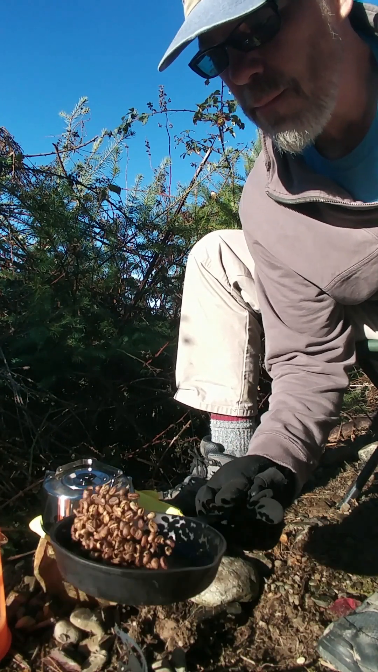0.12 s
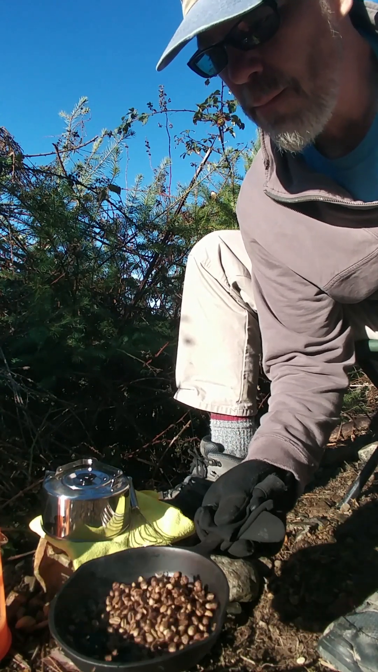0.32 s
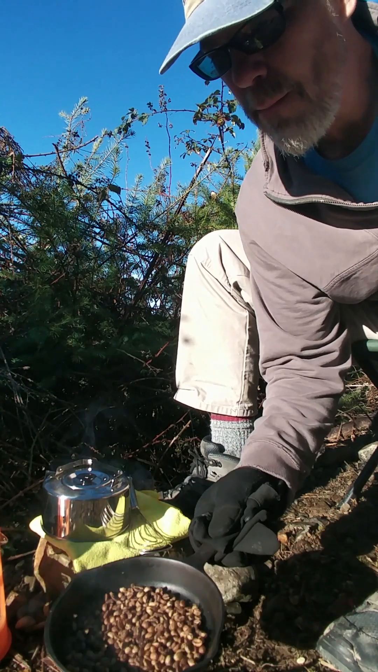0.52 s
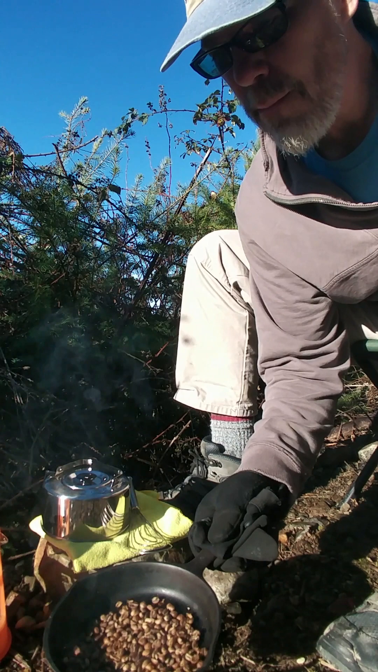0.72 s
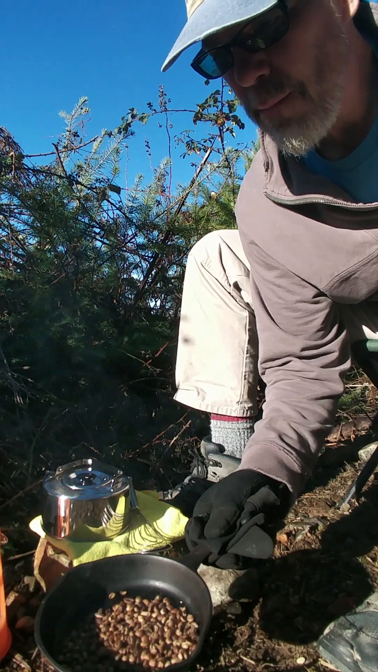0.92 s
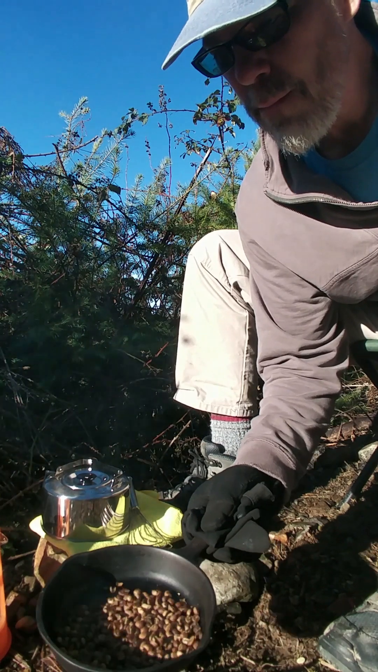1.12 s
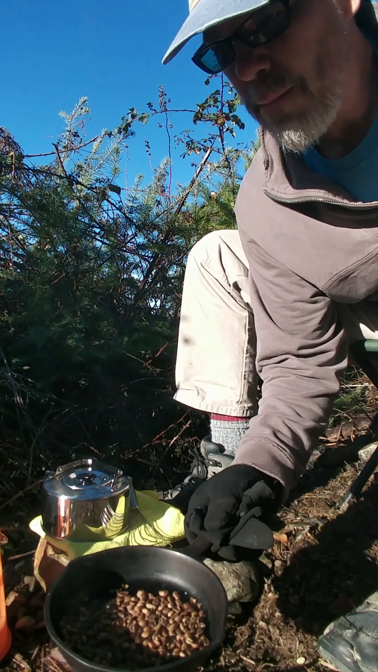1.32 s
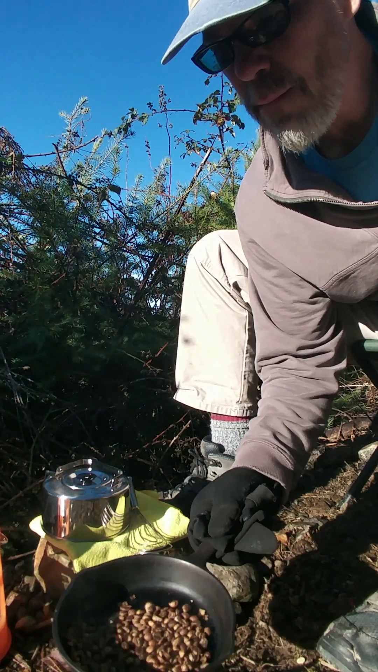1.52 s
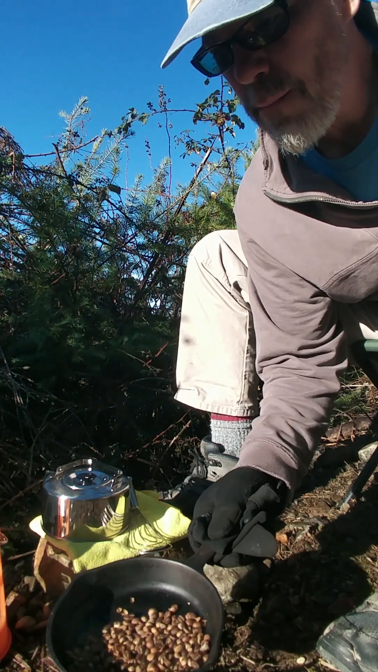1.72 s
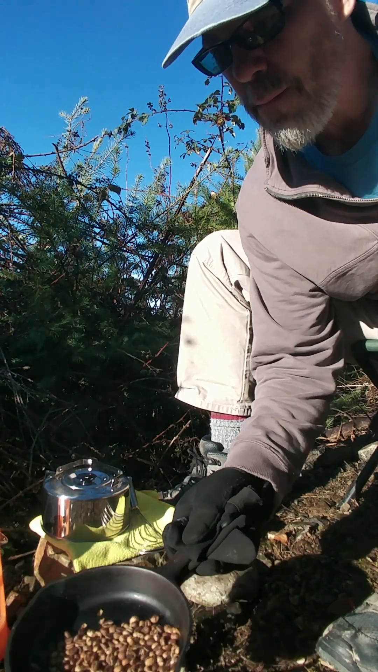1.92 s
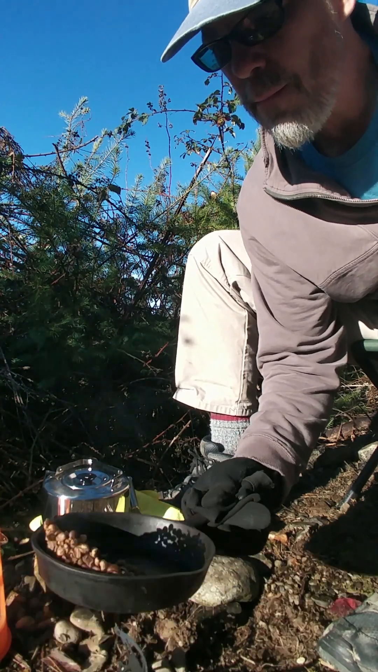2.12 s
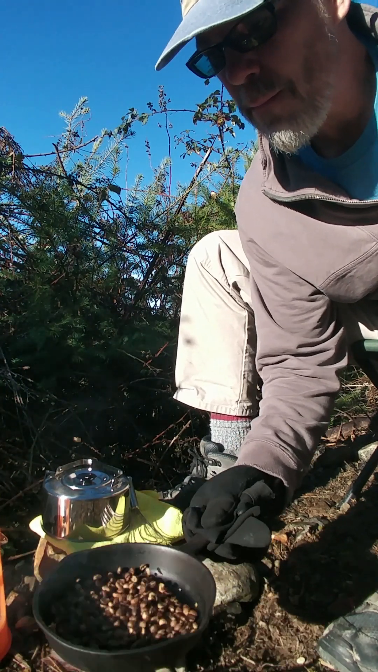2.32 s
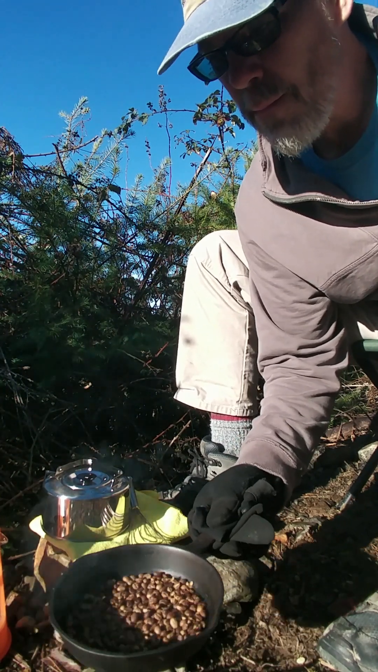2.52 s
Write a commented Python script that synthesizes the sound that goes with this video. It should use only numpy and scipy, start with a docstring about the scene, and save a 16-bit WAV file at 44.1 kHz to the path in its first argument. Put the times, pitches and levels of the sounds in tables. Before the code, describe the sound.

Coffee beans rattle twice across a small ringing metal pan over a low burner rumble.

```python
"""Coffee beans pour twice across a small, ringing metal pan as they roast outdoors over a camping burner.
Each tip of the pan sets off thousands of tiny contacts that click and excite the metal's modes.
Between the shakes the beans tinkle faintly, and one splits with a sharp crack.
Under it all the flame roars and the gas hisses over a low rumble, close to a pair of microphones."""
import sys
import numpy as np
from scipy import signal
from scipy.fft import rfft, irfft
from scipy.io import wavfile
from scipy.ndimage import uniform_filter1d

SR = 44100
rng = np.random.default_rng(int(sys.argv[2]) if len(sys.argv) > 2 else 0)


def wav_out(sig):
    """Save sig, one row per channel (or a flat mono array), as 16-bit PCM at SR to the path in sys.argv[1]."""
    wavfile.write(sys.argv[1], SR, np.round(np.clip(np.atleast_2d(sig).T, -1, 1) * 32767).astype(np.int16))


N = 114660

# modes of the pan (frequency [Hz], level [dB], t60 [s], left minus right [dB], left lag [ms])
PAN_MODES = [(1148, -8, .06, -2.4, .32), (2157, -2, .12, 3, .04), (3315, 1.5, .34, 2.5, -.07),
             (4000, -11.5, .16, 6, .08), (4877, -5, .22, 0, -.055), (5480, -15, .12, 2, .03),
             (5595, -9.5, .12, -4, .02), (6758, -14.5, .11, -2, .04), (7338, -14, .12, -2, -.04),
             (8057, -10.5, .09, -1, 0), (8404, -9, .1, 0, -.028), (8765, -5.5, .08, -3, -.013),
             (8837, -3, .1, -2, -.013), (9325, -16, .1, -2, 0)]
# tone of the dry click of bean on bean (frequency [Hz], level [dB])
BEAN_CLICK = [(200, -9.5), (700, -15), (1200, -8), (1650, -5), (2300, -16.5), (2700, -3), (3400, -2.5),
              (4400, -2.5), (5600, 3.5), (6700, -1), (7600, 2), (8800, 7), (9600, 3.5), (10600, -19),
              (12000, -16.5), (13500, -7.5), (16000, -26.5)]
LONGEST_MODE_HZ = 3315


def pouring_beans(gesture):
    """A shower of beans: each contact clicks and feeds every pan mode by a random amount."""
    hits_per_s, spread_db = 6000, 2
    contact_t60_s, common_t60_s = 0.0071, 0.13
    ring_db, own_ring_db, clatter_db = -25, -0.5, -30.5
    pivot_hz, roll_db_per_octave, roll_onset_s = 4000, -6, .25
    t = np.arange(N) / SR
    times, force_db, tilts = np.array(gesture, float).T
    force = undb(np.interp(t, times, force_db)) * (t > times[0]) * (t < times[-1])
    hardness = np.interp(t, times, tilts)
    # past the peak of the pour, the last rolling beans mainly ring the longest mode
    rolling = np.clip((t - times[np.argmax(force_db)]) / roll_onset_s, 0, 1)
    contacts = rng.random(N) < hits_per_s / SR
    hits = unit(contacts * undb(spread_db * np.clip(rng.standard_normal(N), -2, 2)))
    metal = 0
    for hz, mode_db, t60, pan_db, lag_ms in PAN_MODES:
        roll_db = rolling * roll_db_per_octave * abs(np.log2(hz / LONGEST_MODE_HZ))
        drive = force * undb(hardness * np.log2(hz / pivot_hz) + roll_db)
        buzz = ring(hits * drive * noise_pair(shared=0.85), hz, contact_t60_s)
        # each mode rings with a short decay common to all modes, plus its own decay
        common_ring = unit(ring(buzz, hz, common_t60_s))
        own_ring = undb(own_ring_db) * unit(ring(buzz, hz, t60))
        gain = undb(ring_db + mode_db) * np.sqrt(2 * np.mean(drive ** 2))
        metal = metal + radiate(unit(common_ring + own_ring), hz, pan_db, lag_ms) * gain
    clicks = unit(colour(hits * noise_pair(shared=0.33), BEAN_CLICK))
    dull = signal.sosfiltfilt(signal.butter(2, pivot_hz, fs=SR, output="sos"), clicks)
    clatter = dull * undb(-hardness) + (clicks - dull) * undb(hardness)
    return metal + undb(clatter_db) * force * clatter * sides(pan_db=-4.5)


def bean_crack():
    """A hot bean splits with a snap; a short, dense scatter comes off the pan and the ground."""
    # tone of the snapping shell (frequency [Hz], level [dB])
    shell_tone = [(300, -18), (1600, -12), (2700, -1), (3600, 11), (4600, 15), (5500, 9), (7000, 3),
                  (8200, 14), (8900, 14), (9700, 1), (10700, -10), (12000, -2), (14500, -2), (16000, -8)]
    # tone of the reflections (frequency [Hz], level [dB])
    scatter_tone = [(100, -32), (900, -16), (1700, -15), (2700, -9), (3700, -2), (5000, -4), (6200, -2),
                    (7200, -3), (8500, 4), (9400, 0), (10600, -15), (12000, -9), (14500, -9), (16000, -13)]
    crack_s, scatter_db = 1.2545, -26
    hold_s, early_t60_s, late_t60_s = .014, .05, .13
    age = np.arange(N) / SR - crack_s
    pulse = np.zeros(N)
    pulse[int(crack_s * SR)] = 1
    snap = colour(pulse, shell_tone)
    early = undb(-60 * np.maximum(age - hold_s, 0) / early_t60_s)
    late = undb(-10 - 60 * np.maximum(age, 0) / late_t60_s)
    scatter = unit(colour(noise_pair(shared=0.2), scatter_tone)) * np.hypot(early, late) * (age > 0)
    return lagged([snap, snap], lag_ms=.02) + undb(scatter_db) * scatter * sides(pan_db=-1.5)


def settling_beans():
    """Beans settle and shift: three small clicks and a faint, nearly unbroken tinkle of the pan."""
    # single beans shifting (time [s], push on the pan [dB], click gain [dB])
    shifts = [(.194, -52, -16), (.985, -47, -44), (1.615, -41, -44)]
    settles_per_s, settle_db, spread_db = 30, -54.5, 3
    ring_db, tilt_db_per_octave = -10, -7
    push = (rng.random(N) < settles_per_s / SR) * undb(settle_db + spread_db * rng.standard_normal(N))
    clicks = np.zeros(N)
    for time_s, push_db, click_db in shifts:
        push[int(time_s * SR)] = undb(push_db)
        clicks[int(time_s * SR)] = undb(click_db)
    tinkle = 0
    for hz, mode_db, t60, pan_db, lag_ms in PAN_MODES:
        gain = undb(mode_db + ring_db + tilt_db_per_octave * abs(np.log2(hz / LONGEST_MODE_HZ)))
        tinkle = tinkle + radiate(ring(push, hz, t60), hz, pan_db, lag_ms) * gain
    return tinkle + colour(clicks, BEAN_CLICK)


def burner():
    """The flame roars and flutters; the gas hisses, with narrow bands that swell and fade."""
    # body of the flame (frequency [Hz], density [dB per Hz])
    roar_tone = [(100, -95), (190, -78), (260, -81.5), (340, -71.5), (480, -72.5), (630, -88), (810, -75),
                 (960, -84), (1130, -78), (1400, -87), (1800, -99), (3000, -112), (8000, -135)]
    # hiss of the gas (frequency [Hz], density [dB per Hz])
    hiss_tone = [(1000, -104), (2600, -99), (4500, -101), (5400, -99), (6700, -94), (7500, -94),
                 (8700, -91.5), (9600, -99), (11000, -105), (12500, -99), (14000, -101), (15000, -105),
                 (16000, -103)]
    # swells in the hiss (peak time [s], half-length [s], centre [Hz], width [Hz], level [dB])
    swells = [(0.068, 0.22, 8500, 800, -56), (0.08, 0.52, 3790, 220, -59.5), (.73, 0.075, 6770, 450, -56),
              (1.048, 1, 3780, 250, -63.5), (1.538, 0.075, 3760, 220, -57), (1.724, 0.14, 6720, 500, -57.5),
              (1.887, 0.092, 7050, 500, -57.5), (2.107, 0.15, 8600, 800, -61), (2.135, .14, 3830, 220, -62),
              (2.56, 0.59, 3770, 220, -59)]
    flutter_db, waver_db, hiss_shared = 2.15, 0.59, 0.29
    t = np.arange(N) / SR
    roar = noise_bed(roar_tone, shared=.96) * undb(flutter_db * drift(rate_hz=24.62)) * low_end_gain()
    hiss = noise_bed(hiss_tone, hiss_shared) * undb(waver_db * drift(rate_hz=5.52))
    for peak_s, half_s, hz, width_hz, db in swells:
        band = signal.lfilter(*signal.iirpeak(hz, hz / width_hz, fs=SR), noise_pair(hiss_shared))
        band = signal.lfilter(*signal.iirpeak(hz, hz / width_hz / 2, fs=SR), band)
        hiss = hiss + unit(band) * undb(db) * np.exp(-2 * ((t - peak_s) / half_s) ** 2)
    return lagged(roar * sides(pan_db=-2.2) + hiss * sides(pan_db=-6.5), lag_ms=0.3063)


def rumble():
    """A low rumble with a hum that wavers in pitch."""
    # tone of the rumble (frequency [Hz], density [dB per Hz])
    rumble_tone = [(20, -104), (32, -79), (42, -86), (56, -60.5), (72, -78), (89, -67), (104, -68),
                   (125, -73.5), (160, -78.5), (250, -81), (500, -100), (1000, -130)]
    hum_hz, hum_db, wander = 88.6, -48.5, 0.032
    pitch_hz = hum_hz * (1 + wander * drift(rate_hz=14.13))
    hum = unit(np.sin(2 * np.pi * np.cumsum(pitch_hz) / SR)) * undb(hum_db)
    return lagged((noise_bed(rumble_tone, shared=1.0) + hum) * low_end_gain(), lag_ms=0.32)


def low_end_gain():
    """The roar and the rumble rise and fall gently together."""
    # their slow level ride (time [s], level [dB])
    ride = [(0, 0.5), (.5, 0.5), (1.0, 2), (1.3, -1), (1.58, 2.5), (1.72, 0), (2.6, -0.5)]
    return undb(np.interp(np.arange(N) / SR, *np.array(ride).T))


def undb(db):
    """Decibels to gain."""
    return 10 ** (np.asarray(db) / 20)


def unit(x):
    """Scale to rms 1."""
    return x / np.sqrt(np.mean(abs(x) ** 2) + 1e-30)


def colour(x, points):
    """Minimum-phase EQ through the points (frequency [Hz], level [dB])."""
    hz, db = np.array(points, float).T
    size = 2 * N
    bins_hz = np.maximum(np.fft.rfftfreq(size, 1 / SR), 1)
    cepstrum = irfft(np.log(undb(np.interp(np.log(bins_hz), np.log(hz), db))))
    # folded onto positive time, so nothing rings ahead of an attack
    cepstrum[1:N] *= 2
    cepstrum[N + 1:] = 0
    return irfft(rfft(x, size) * np.exp(rfft(cepstrum)))[..., :N]


def ring(x, hz, t60):
    """One decaying mode driven by x, as a complex signal."""
    return signal.lfilter([1], [1, -np.exp((2j * np.pi * hz - np.log(1000) / t60) / SR)], x)


def radiate(mode, hz, pan_db, lag_ms):
    """A pan mode as it reaches the two microphones."""
    left_phase = np.exp(-2j * np.pi * hz * lag_ms / 1000)
    return (mode * np.array([[left_phase], [1]])).imag * sides(pan_db)


def sides(pan_db):
    """Left and right gains; positive leans left."""
    return undb(np.array([[pan_db], [-pan_db]]) / 2)


def lagged(pair, lag_ms):
    """The left microphone hears the sound later."""
    delay = np.exp(-2j * np.pi * np.fft.rfftfreq(N, 1 / SR) * lag_ms / 1000)
    return np.array([irfft(rfft(pair[0]) * delay, N), pair[1]])


def noise_pair(shared):
    """Left and right white noise with a share of their power in common."""
    noise = rng.standard_normal((3, N))
    return np.sqrt(shared) * noise[0] + np.sqrt(1 - shared) * noise[1:]


def noise_bed(spectrum, shared):
    """Steady stereo noise with the given density per Hz."""
    return colour(noise_pair(shared), spectrum) * np.sqrt(SR / 2)


def drift(rate_hz):
    """Smooth random modulation at rms 1."""
    hold = int(SR / rate_hz)
    steps = np.repeat(rng.standard_normal(N // hold + 1), hold)
    return unit(uniform_filter1d(uniform_filter1d(steps, hold), hold)[:N])


def scene():
    """Two shakes, one crack and settling beans over the burner and the rumble."""
    # one gesture per shake of the pan (time [s], force [dB], contact hardness [dB per octave])
    shakes = [
        [(.193, -20.5, -4), (.208, -15.5, 0.5), (.222, -10.5, -8.5), (.234, -2.5, 0), (.254, 3, -4.5),
         (.28, -1.5, 0.5), (.3, 3, 4.5), (.326, 2.5, 4), (.346, -5.5, 0), (.372, -14, 8), (.4, -16.5, -1),
         (.425, -17, -1.5), (.46, -24, 4), (.5, -35.5, 1), (.565, -26, -3), (.66, -47, 3)],
        [(2.175, -42, -11), (2.195, -23, -6.5), (2.21, -15.5, -2), (2.224, -5.5, -2.5), (2.258, -4.5, -1),
         (2.29, 0, -1.5), (2.312, -10.5, -2.5), (2.333, -22.5, 3), (2.36, -13.5, 0.5), (2.385, -28, -5),
         (2.42, -24.5, -1.5), (2.46, -20, 3), (2.49, -40, -4), (2.53, -52, 1)],
    ]
    pours = sum(pouring_beans(gesture) for gesture in shakes)
    return pours + settling_beans() + bean_crack() + burner() + rumble()


def record(dry):
    """Peaks clip just under full scale, then a steep low-pass cuts the top."""
    top_hz = 15900
    lowpass = signal.ellip(8, .2, 70, top_hz, fs=SR, output="sos")
    return signal.sosfilt(lowpass, np.clip(dry, -.9, .9))


dry = scene()
out = record(dry)
wav_out(out)
```